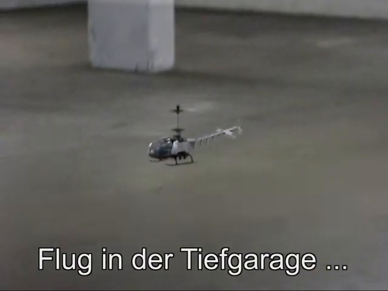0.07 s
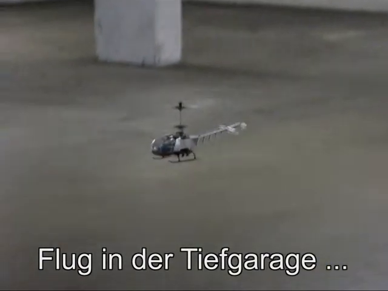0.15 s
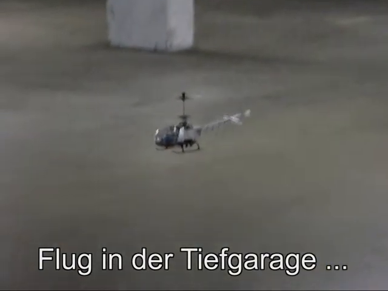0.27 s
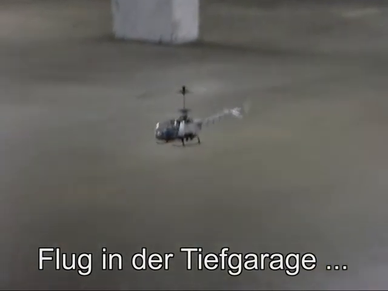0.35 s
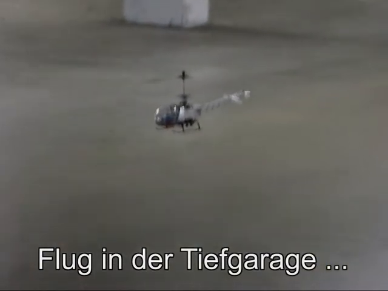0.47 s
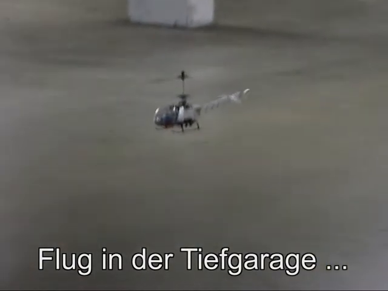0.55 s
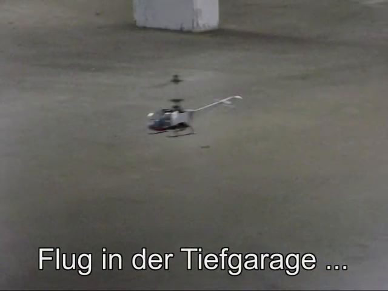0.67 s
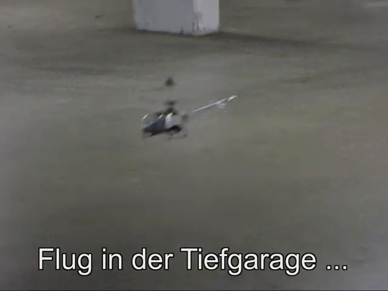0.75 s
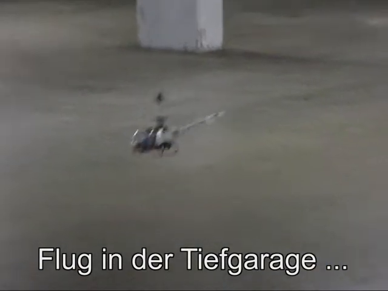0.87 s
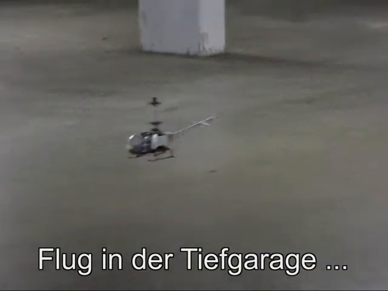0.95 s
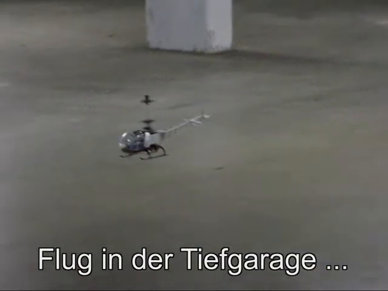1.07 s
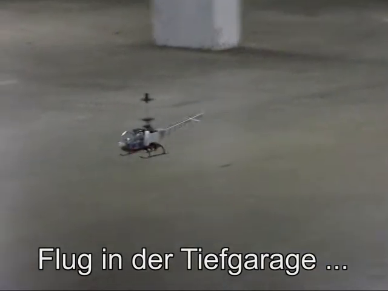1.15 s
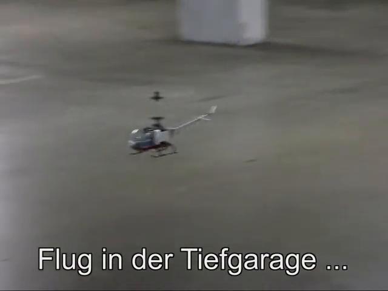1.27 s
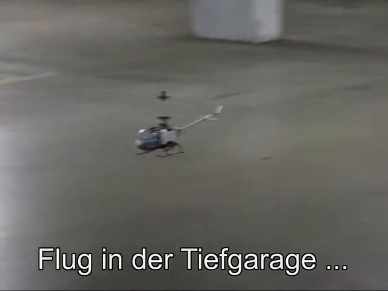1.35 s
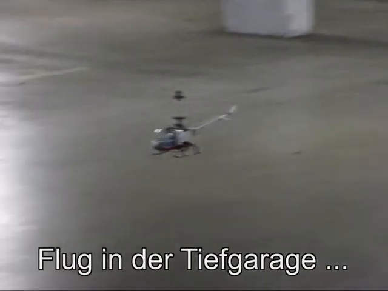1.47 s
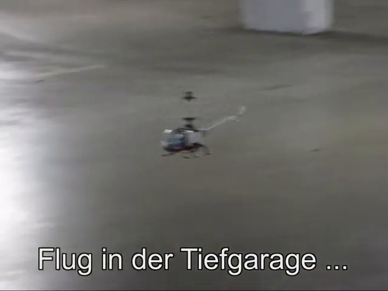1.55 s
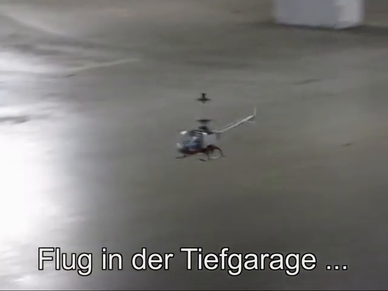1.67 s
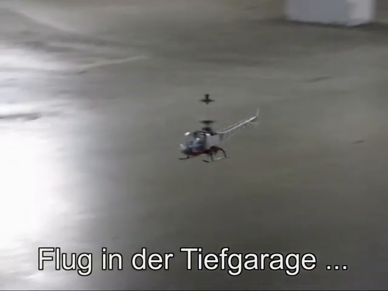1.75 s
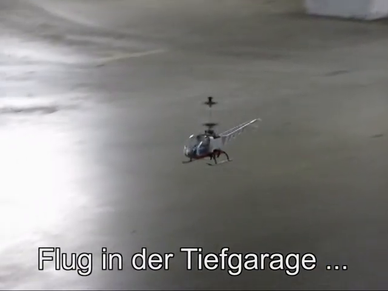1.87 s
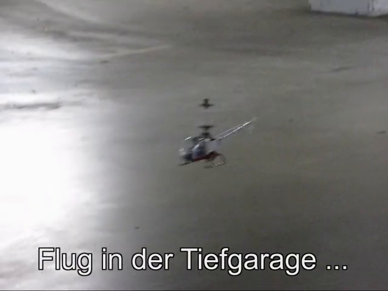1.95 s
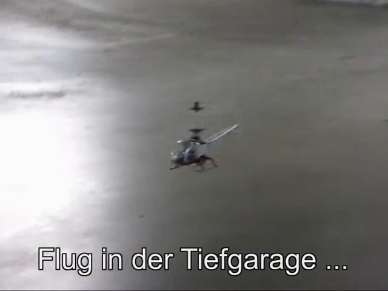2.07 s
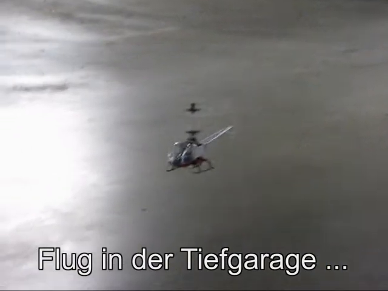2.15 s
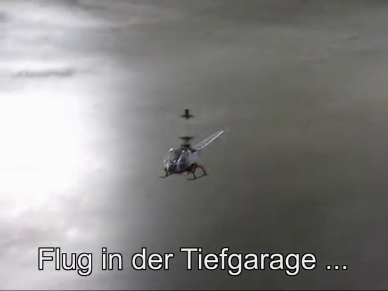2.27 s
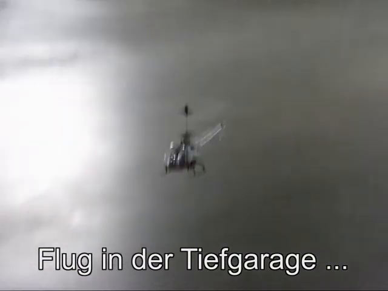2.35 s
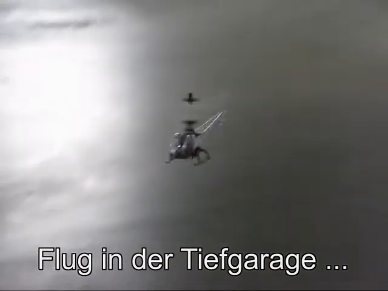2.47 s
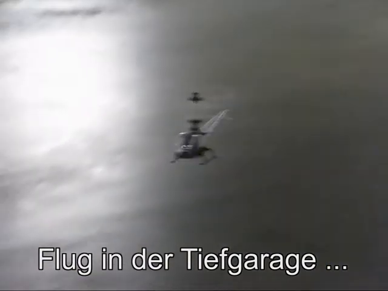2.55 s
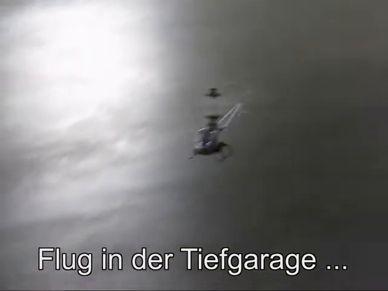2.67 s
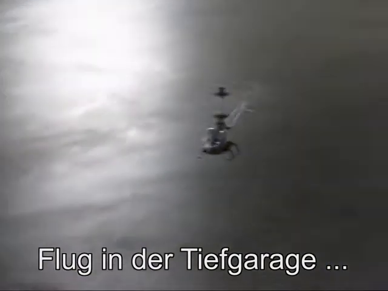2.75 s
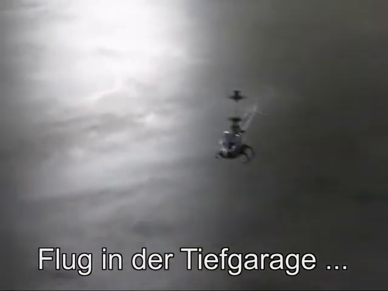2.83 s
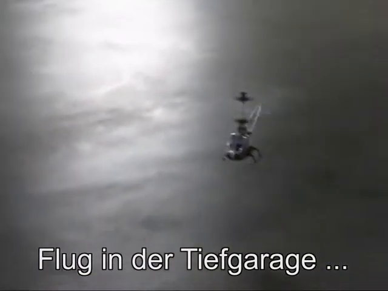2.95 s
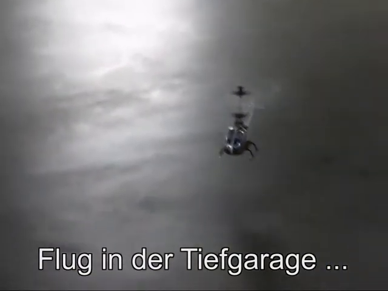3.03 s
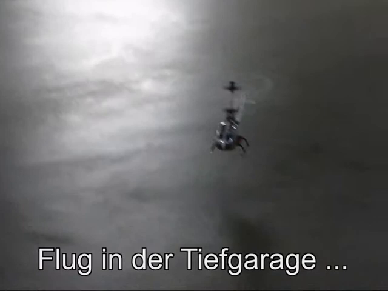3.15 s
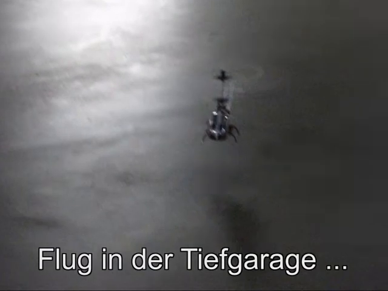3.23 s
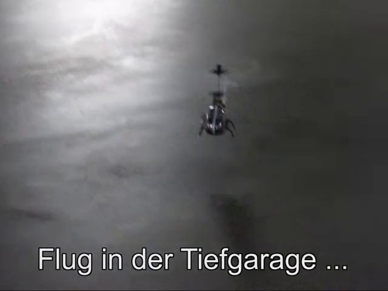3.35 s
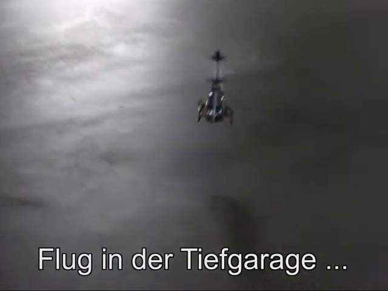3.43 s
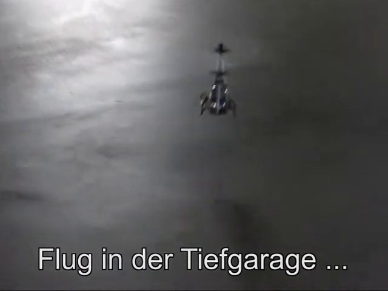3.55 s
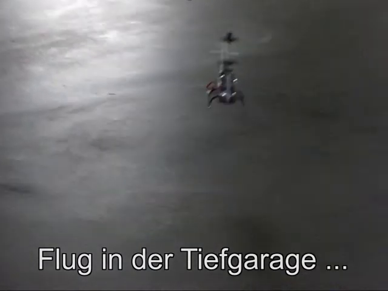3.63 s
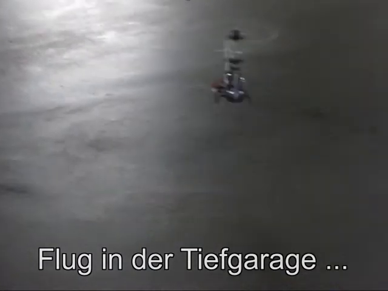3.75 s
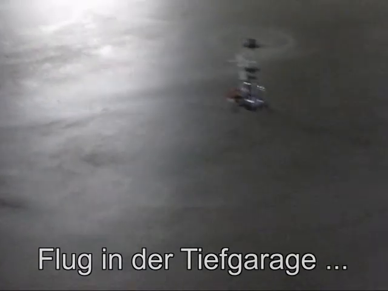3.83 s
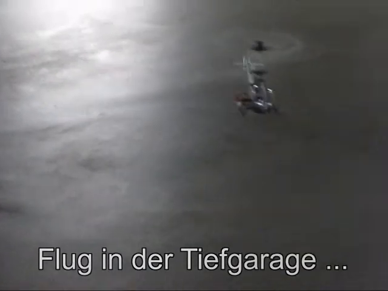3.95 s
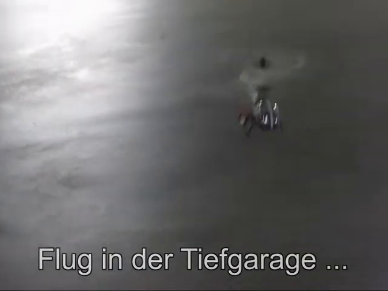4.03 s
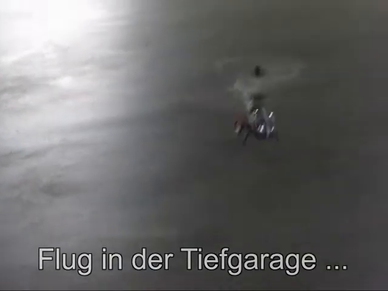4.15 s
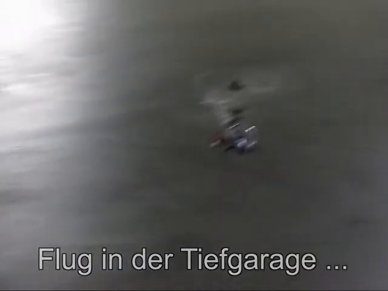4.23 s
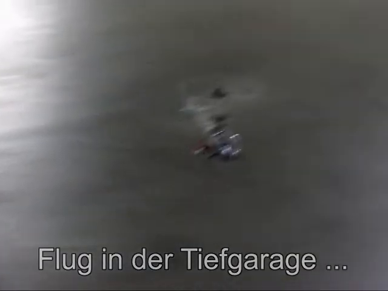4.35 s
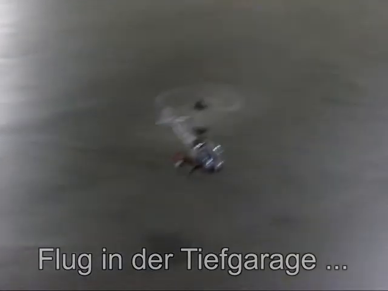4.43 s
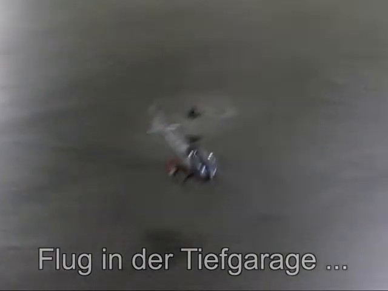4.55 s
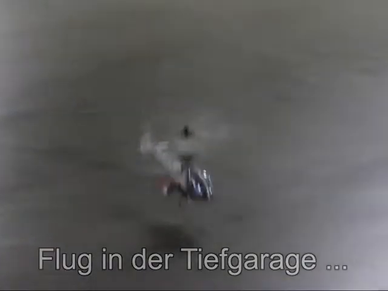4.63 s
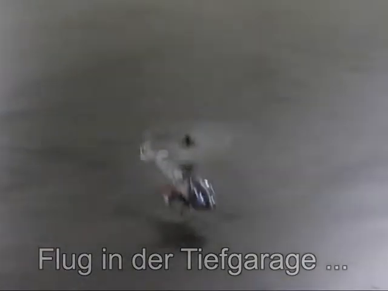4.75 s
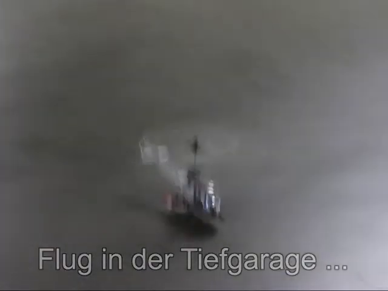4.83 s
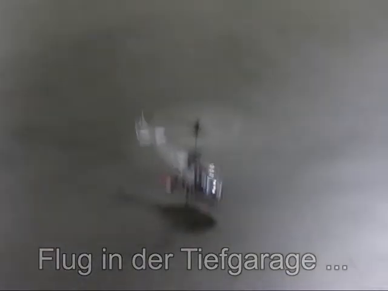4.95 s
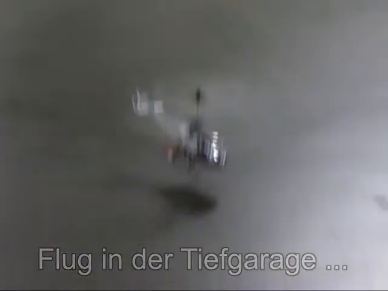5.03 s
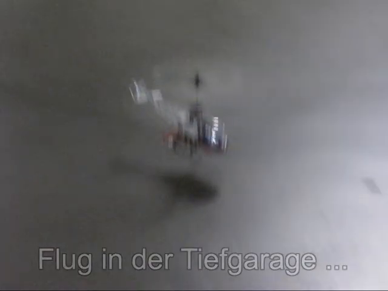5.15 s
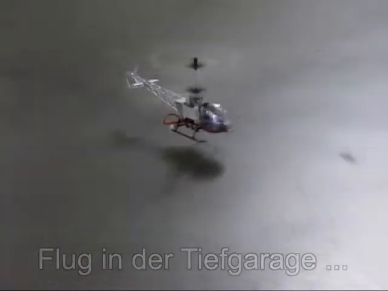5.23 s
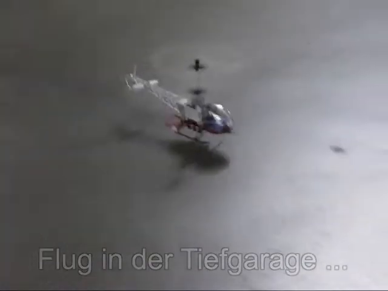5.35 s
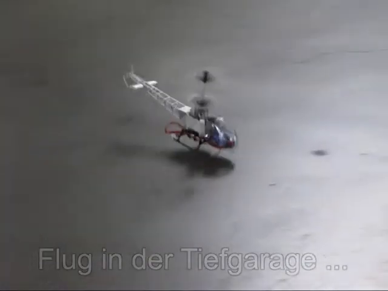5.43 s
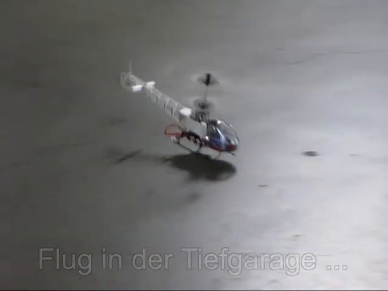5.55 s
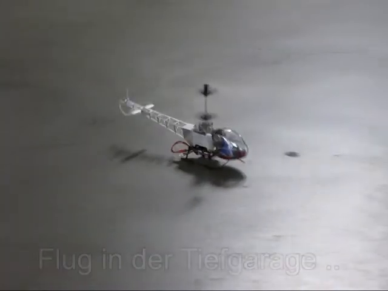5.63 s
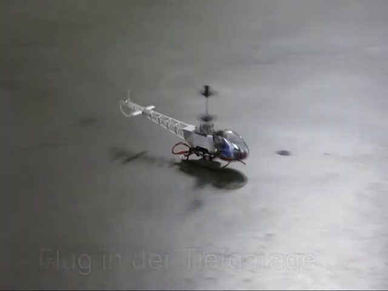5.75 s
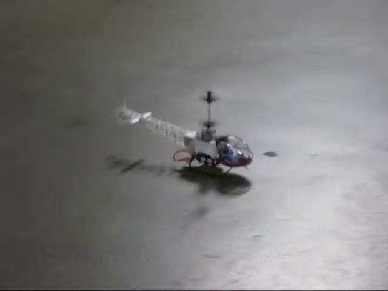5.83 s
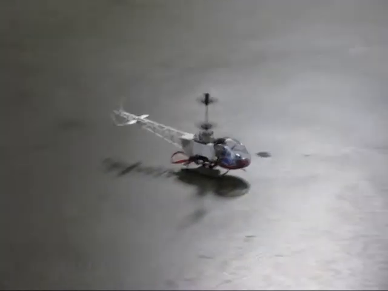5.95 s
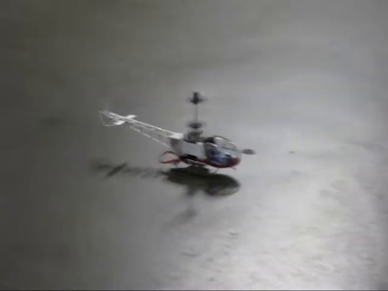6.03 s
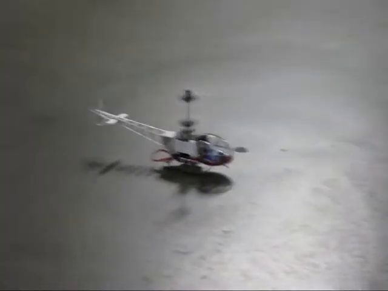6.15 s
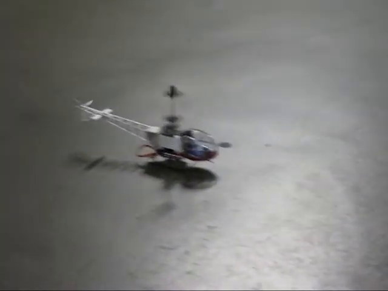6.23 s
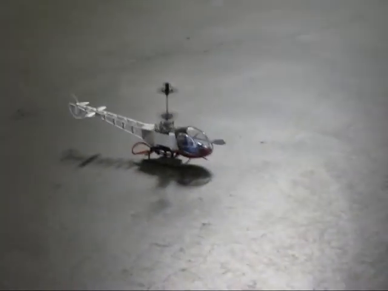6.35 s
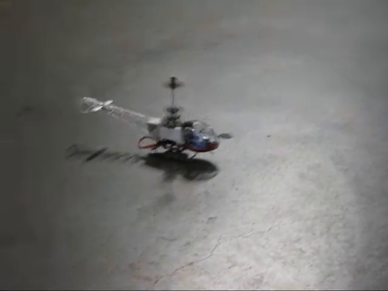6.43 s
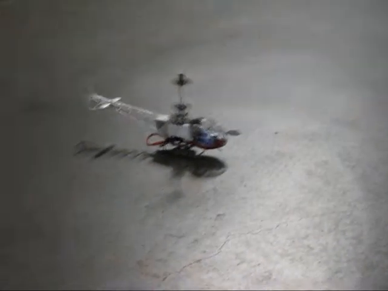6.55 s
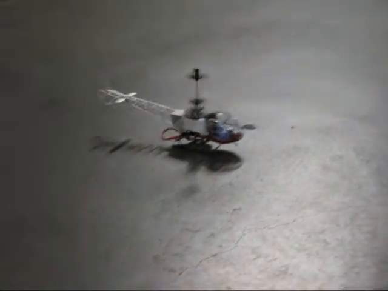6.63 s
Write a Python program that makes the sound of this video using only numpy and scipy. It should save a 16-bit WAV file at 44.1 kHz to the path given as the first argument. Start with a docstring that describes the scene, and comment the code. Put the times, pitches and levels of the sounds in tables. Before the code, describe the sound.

The high gear whine and buzzing rotors of a hovering model helicopter reverberate through a concrete hall before winding down.

```python
"""In a concrete car park a small coaxial electric model helicopter hovers, sinks and throttles down.
Two motors drive two rotors through spur gears. The meshing teeth whine and rattle, their impacts and
the motor shafts shake the airframe, and the blades hum over the rush of their downwash.
Reverberation smears every tone; the sound is faded out at the end."""
import sys
import numpy as np
from scipy import signal
from scipy.fft import rfft, irfft, next_fast_len
from scipy.io import wavfile
from scipy.ndimage import uniform_filter1d, map_coordinates

SR = 44100
rng = np.random.default_rng(int(sys.argv[2]) if len(sys.argv) > 2 else 0)


def materialize(psi):
    """Save the field psi as 16-bit PCM at rate SR to the path in sys.argv[1].

    A 1-D psi becomes a single channel; in a 2-D psi each row is a channel.
    """
    bounded = np.clip(np.atleast_2d(psi).T, -1, 1)
    quanta = np.round(bounded * 32767).astype(np.int16)
    wavfile.write(sys.argv[1], SR, quanta)


N = 295029
TIME = np.arange(-SR, N) / SR  # t/s; starts a second early, so the hall is already full of sound
PINION_TEETH, GEAR_TEETH = 8, 68


def amp(db):
    """Amplitude ratio of a level in decibels."""
    return 10 ** (np.asarray(db) / 20)


def unit(x):
    """Normalisation to rms 1."""
    return x / np.sqrt(np.mean(x ** 2) + 1e-20)


def steady(x):
    """Normalisation to rms 1 over a sliding fifth of a second; faster flutter stays."""
    power = np.abs(uniform_filter1d(x ** 2, size=SR // 5))
    return x / np.sqrt(power + 1e-12)


def along(points, hz):
    """Interpolation of (f/Hz, value) points on a logarithmic frequency axis."""
    f, values = np.transpose(points)
    return np.interp(np.log(hz + 1), np.log(f + 1), values)


def wobble(rate):
    """Smooth random fluctuation: a spline through `rate` Gaussian knots a second."""
    coarse = np.linspace(TIME[0], TIME[-1], 12000)
    at = (coarse - coarse[0]) * rate
    knots = rng.standard_normal(int(at[-1]) + 4)
    return np.interp(TIME, coarse, map_coordinates(knots, [at]))


def filtered(x, response):
    """Linear filtering: the spectrum of x times a frequency response."""
    size = next_fast_len(len(x) + SR // 2)
    hz = np.fft.rfftfreq(size, 1 / SR)
    return irfft(rfft(x, size) * response(hz), size)[:len(x)]


def coloured(x, spectrum):
    """Spectral shaping by (f/Hz, level/dB) points, at rms 1."""
    return unit(filtered(x, lambda hz: amp(along(spectrum, hz))))


def ramp(start_s, length_s):
    """Linear rise from 0 to 1."""
    return np.clip((TIME - start_s) / length_s, 0, 1)


def flight_stages(mid_s=2.39, width_s=1.5):
    """Envelopes from 0 to 1: a Gaussian swell in mid-flight and a ramp towards the end."""
    mid = np.exp(-((TIME - mid_s) / width_s) ** 2)
    late = ramp(start_s=3.39, length_s=1.82)
    return mid, late


def level(speed, hover_db, octave_db, mid_db, late_db):
    """Source strength: a gain set by the speed in octaves and by the stage of the flight."""
    mid, late = flight_stages()
    return amp(hover_db + octave_db * speed + mid_db * mid + late_db * late)


def motor_load(idle_s=5.984, decay_db_per_s=22):
    """Exponential decay: on the floor the motors stop pulling and the tones die away."""
    return amp(-decay_db_per_s * np.maximum(TIME - idle_s, 0))


def tooth_rates(landing_s=5.2, run_down_hz_per_s=470, trim_hz=38, nudge_ramp_s=.22):
    """Mesh frequencies in Hz: both rotors follow the throttle; the lower, trimmed ahead, also steers."""
    # throttle in flight: t/s, mesh frequency of the upper rotor f/Hz
    throttle = [(.55, 2197), (.82, 2170), (1.7, 2162), (2.2, 2090), (2.45, 2135), (3.7, 2112), (3.95, 2078),
                (4.6, 2046), (5.2, 1917)]
    # steering nudges: start t/s, duration t/s, change of mesh frequency f/Hz
    nudges = [(-1, 1.72, 33), (0.87, .6, -69), (4, .93, -90), (5.5, .37, -55.5)]
    upper = np.interp(TIME, *np.transpose(throttle))
    upper -= run_down_hz_per_s * np.maximum(TIME - landing_s, 0)
    lead = nudge_ramp_s / 2
    steer = sum(hz * (ramp(start - lead, nudge_ramp_s) - ramp(start + length - lead, nudge_ramp_s))
                for start, length, hz in nudges)
    return upper, upper + trim_hz + steer


def rotor_turns(rates, drift):
    """Phase as the integral of frequency: revolutions of both rotors, their speeds wavering."""
    return [np.cumsum(tooth_hz * (1 + drift * wobble(9))) / GEAR_TEETH / SR for tooth_hz in rates]


def hall(x, wet_db):
    """Reverberation: direct sound plus a diffuse tail, new for each position, held at rms 1."""
    # reverberation time of the bare concrete hall: f/Hz, T60/s
    decay_times = [(100, 1.9), (1000, 3.3), (4000, 2.8), (15000, 0.27)]
    hz, t, grid = signal.stft(np.zeros(SR), SR, nperseg=256)
    decay = amp(-60 * t / along(decay_times, hz)[:, None])
    hop = SR * 3 // 5
    padded = np.pad(x, (0, 2 * hop))
    echo = np.zeros(len(padded) + 2 * SR)
    window = np.hanning(2 * hop)
    for start in range(0, len(x), hop):
        noise = rng.standard_normal(grid.shape) + 1j * rng.standard_normal(grid.shape)
        tail = signal.istft(decay * noise, nperseg=256)[1]
        answer = signal.fftconvolve(padded[start:start + 2 * hop] * window, tail)
        echo[start:start + len(answer)] += answer
    return steady(unit(x) + amp(wet_db) * unit(echo[:len(x)]))


def downwash(speed):
    """Turbulence: the air driven down by the rotors radiates broadband noise."""
    # spectrum of the rotor wash: f/Hz, relative density level/dB
    spectrum = [(22, -21), (42, -17), (65, -13), (105, -11), (180, -2), (310, 1), (520, -1), (880, -13),
                (3000, -42)]
    rush = coloured(rng.standard_normal(len(TIME)), spectrum)
    return rush * level(speed, hover_db=-51.0, octave_db=11, mid_db=1.2, late_db=-3.5)


def hum(turns, orders, fading_db):
    """Shaft harmonics: each swells or fades by its own amount, in mid-flight and towards the end."""
    mid, late = flight_stages()
    tones = np.zeros(len(TIME))
    for order, db, mid_db, late_db in orders:
        standing_wave_db = fading_db * wobble(2.475)
        gain = amp(db + mid_db * mid + late_db * late + standing_wave_db)
        tones += gain * np.sin(2 * np.pi * (round(order) * turns + rng.random()))
    return tones


def blade_hum(rotors, speed):
    """Rotational noise: the blades push the air periodically, in tones that swell and fade."""
    # blade tones: multiple of the rotor rate, level/dB, change in mid-flight/dB, towards the end/dB
    harmonics = [(4, -7, -10, -6), (6, -10.5, 6.5, -3.5), (8, 3, -1, -0.5), (12, -5, 3, 4),
                 (16, -7.5, 3.5, 0)]
    upper, lower = (hum(turns, harmonics, fading_db=2.0) for turns in rotors)
    drone = motor_load() * hall(upper + amp(-7) * lower, wet_db=-1)
    swell = amp(wobble(5))
    return drone * swell * level(speed, hover_db=-48.5, octave_db=34, mid_db=1.0, late_db=-2.0)


def airframe(rotors, clicks, speed):
    """Forced vibration: tooth impacts and both motor shafts shake the canopy and frame."""
    # motor tones: multiple of the shaft rate, level/dB, change in mid-flight/dB, towards the end/dB
    harmonics = [(3, -10.5, -2, 6), (4, -1.5, 2.5, 1), (5, -6, 3, 0), (7, -3.5, -1, 3.5),
                 (10, -9.5, 0, 10.5), (12, -5, 2.5, 5.5)]
    # response of canopy and frame: f/Hz, relative level/dB
    response = [(50, -60), (200, -20), (450, -15), (650, -9), (820, -4), (1000, 3.5), (1200, -3),
                (1600, -2), (2300, 0), (4000, -47)]
    # backlash lets each pinion run a little ahead of its gear or behind it
    shafts = [turns * GEAR_TEETH / PINION_TEETH + 0.021 * wobble(50) for turns in rotors]
    upper, lower = (hum(turns, harmonics, fading_db=3.5) for turns in shafts)
    motors = unit(upper + amp(-2.5) * lower) * motor_load()
    motors *= level(speed, hover_db=-7.5, octave_db=17, mid_db=4.5, late_db=3.0)  # re the clicks
    body = hall(coloured(clicks, response) + motors, wet_db=4.5)
    return body * level(speed, hover_db=-33.0, octave_db=10.5, mid_db=3.0, late_db=0.6)


def runout(turns, slope):
    """Periodic shape error of a main gear: a Fourier series, mostly broad lobes, repeated each turn."""
    orders = np.arange(1, GEAR_TEETH // 2)
    angle = np.linspace(0, 1, 512)  # in turns
    offsets = rng.random((len(orders), 1))
    lobes = orders ** -slope @ np.cos(2 * np.pi * (orders[:, None] * angle + offsets))
    return np.interp(turns % 1, angle, unit(lobes))


def tooth_impacts(turns, scatter_db, slack_teeth, pattern_db):
    """Impulse train: one click a tooth, jittered by backlash; high spots of the gear click harder."""
    count = int(turns[-1] * GEAR_TEETH)
    contacts = np.arange(count) + slack_teeth * rng.standard_normal(count)
    at = np.interp(contacts, turns * GEAR_TEETH, np.arange(len(TIME)))
    strength = amp(scatter_db * rng.standard_normal(count)) * rng.choice([-1, 1], count)
    clicks = np.bincount(at.astype(int), strength, len(TIME))
    return unit(clicks * amp(pattern_db * runout(turns, slope=0.78)))


def gear_ring(clicks):
    """Resonance: the struck plastic gears ring broadly, with narrow peaks and gaps."""
    # broad response of the gears: f/Hz, relative level/dB
    response = [(100, -58.5), (700, -47), (1500, -26), (2000, -10.5), (2600, -3.5), (3200, -0.5),
                (3700, -0.5), (4300, 0.5), (5000, -3), (5600, -5), (6700, -3), (9500, -6), (12000, -7.5),
                (15500, -12)]
    # modes and gaps of wheels and struts: centre f/Hz, width f/Hz, level/dB
    modes = [(1780, 90, -15), (2290, 136, 7.5), (2456, 34, 4), (2620, 23, 2.5), (2770, 49, -4.5),
             (3090, 64, 3), (5320, 150, 1.5), (6500, 310, 0.5), (7660, 220, 1.5), (10200, 280, 1.5),
             (12000, 440, 3.5)]

    def modal_gain(hz):
        return amp(sum(db / (1 + (2 * (hz - centre) / width) ** 2) for centre, width, db in modes))

    return unit(filtered(coloured(clicks, response), modal_gain))


def dulled(x, speed, edge_hz=11000, db_per_octave=7):
    """Shelving filter: the top treble dulls as the rotors slow."""
    treble = filtered(x, lambda hz: 1 - 1 / (1 + (hz / edge_hz) ** 6))
    return x + (amp(db_per_octave * speed) - 1) * treble


def whine(turns, orders, swing_rad, throb, flutter_rad):
    """Modulation: teeth mesh early and late, hard and soft, giving sidebands at the rotor rate."""
    phase = 2 * np.pi * GEAR_TEETH * turns + swing_rad * runout(turns, slope=1.07)
    phase += flutter_rad * wobble(110)
    pressure = 1 + throb * runout(turns, slope=1.5)
    return pressure * sum(amp(db) * np.sin(round(order) * phase) for order, db in orders)


def gear_rattle(rotors, clicks, speed):
    """Impact excitation: sharp tooth contacts ring the gears and add rough mesh overtones."""
    # overtones of the meshing teeth: multiple of the mesh frequency, level/dB
    harmonics = [(2, -4), (3, -10.5), (4, -10), (5, -13), (6, -17.5)]
    overtones = sum(whine(turns, harmonics, swing_rad=.42, throb=.3, flutter_rad=.62) for turns in rotors)
    edge = unit(overtones) * motor_load()
    edge *= level(speed, hover_db=-4.0, octave_db=-13, mid_db=-3.5, late_db=-8.5)  # re the ring
    teeth = hall(gear_ring(clicks) + edge, wet_db=0.5)
    shiver_db = 0.22 * wobble(5.3) + 0.6 * wobble(20) + 0.49 * wobble(60)  # unsteady tooth load
    rattle = dulled(teeth, speed) * amp(shiver_db)
    return rattle * level(speed, hover_db=-22.0, octave_db=23, mid_db=2.06, late_db=-1.5)


def mesh_tone(rotors, speed):
    """Periodic forcing: each gear pair whines at the rate at which its teeth engage."""
    upper, lower = (whine(turns, [(1, 0)], swing_rad=.35, throb=.42, flutter_rad=.13) for turns in rotors)
    tone = motor_load() * hall(upper + amp(-3.0) * lower, wet_db=.5)
    return tone * level(speed, hover_db=-20.0, octave_db=9.5, mid_db=0.26, late_db=-10.0)


def scene():
    """Superposition: gears, airframe, blades and downwash, all following the rotor speeds."""
    rates = tooth_rates()
    speed = np.log2(rates[0] / rates[0][0])  # octaves above the opening hover speed
    rotors = rotor_turns(rates, drift=.002)
    clicks = sum(tooth_impacts(turns, scatter_db=1.95, slack_teeth=.3, pattern_db=1.5) for turns in rotors)
    gears = mesh_tone(rotors, speed) + gear_rattle(rotors, clicks, speed)
    craft = gears + airframe(rotors, clicks, speed) + blade_hum(rotors, speed) + downwash(speed)
    return np.array([craft, craft])[:, -N:]


def record(dry, fade_s=0.76, fade_power=1.09, top_hz=15800):
    """Power-law fade to silence at the end, and a low-pass band limit."""
    remaining_s = (N - np.arange(N)) / SR
    fade = np.clip(remaining_s / fade_s, 0, 1) ** fade_power
    return np.array([filtered(channel * fade, lambda hz: hz < top_hz) for channel in dry])


dry = scene()
out = record(dry)
materialize(out)
```